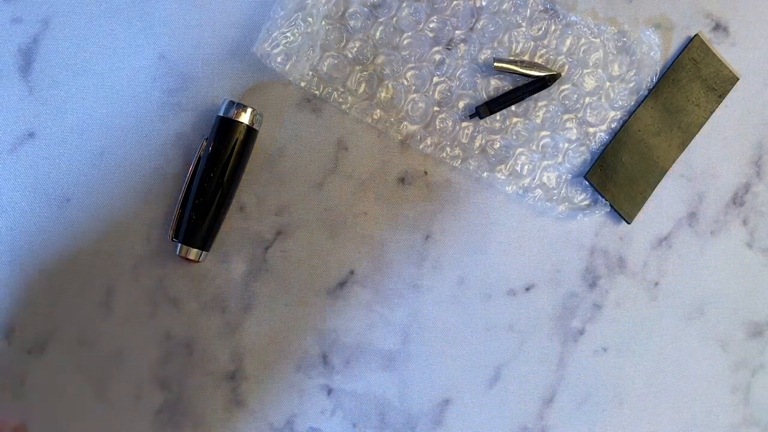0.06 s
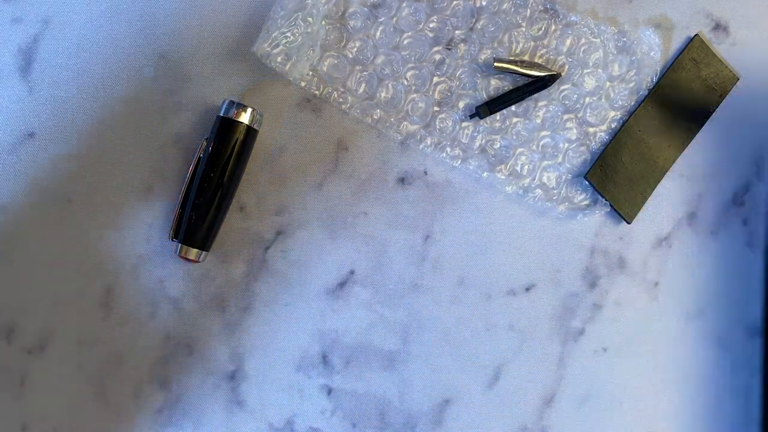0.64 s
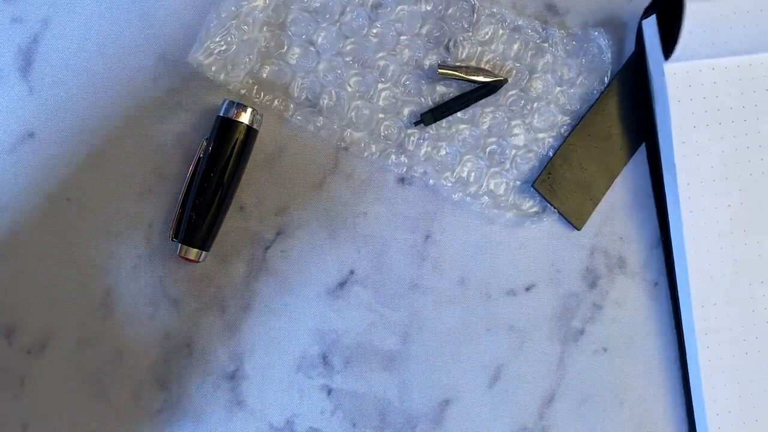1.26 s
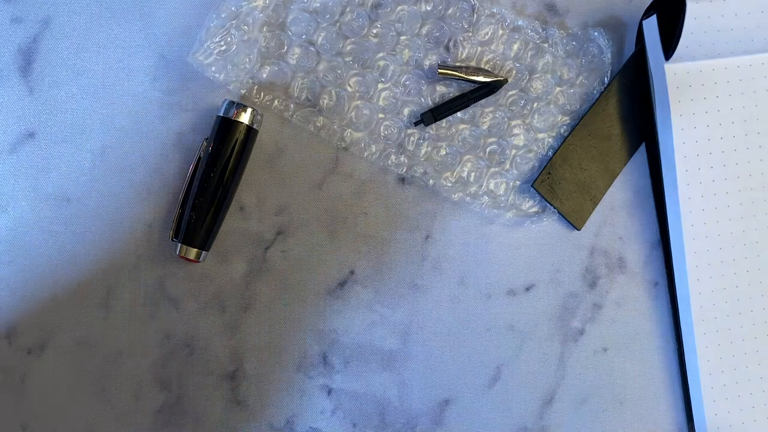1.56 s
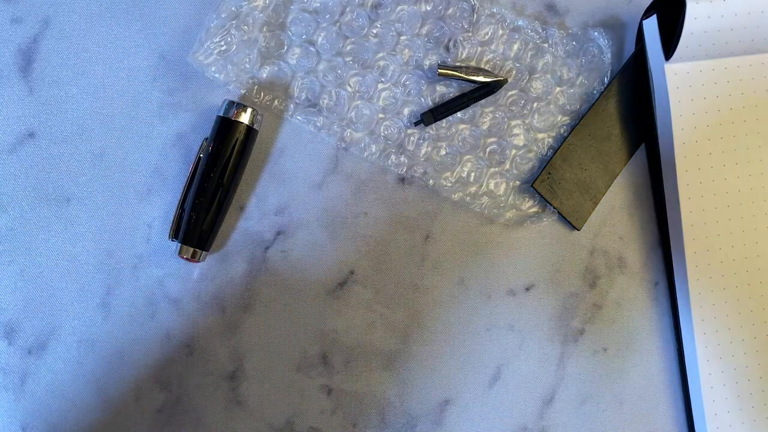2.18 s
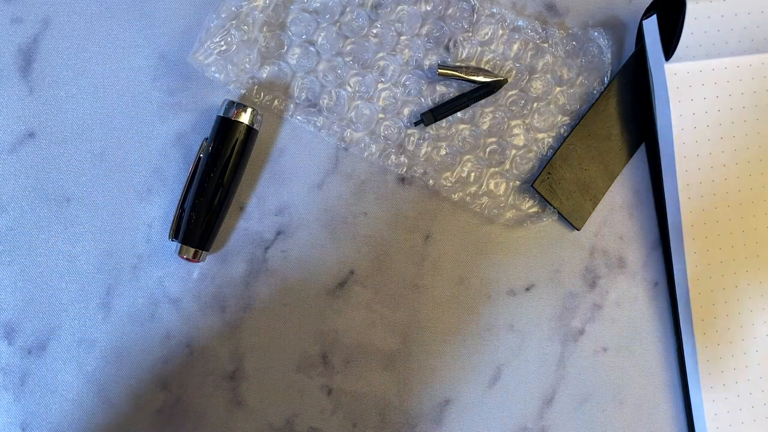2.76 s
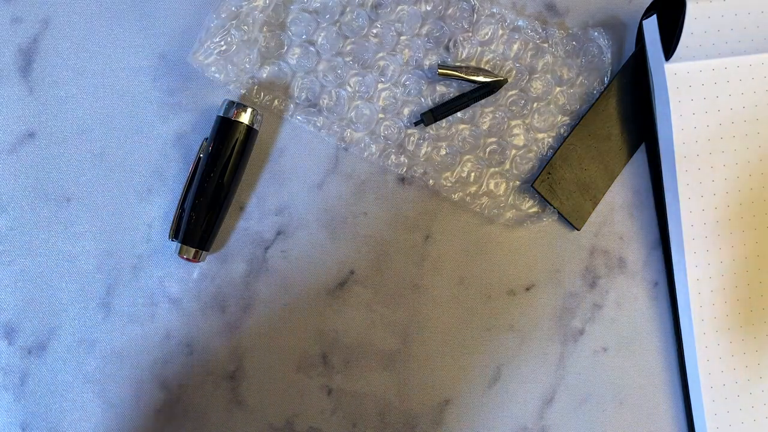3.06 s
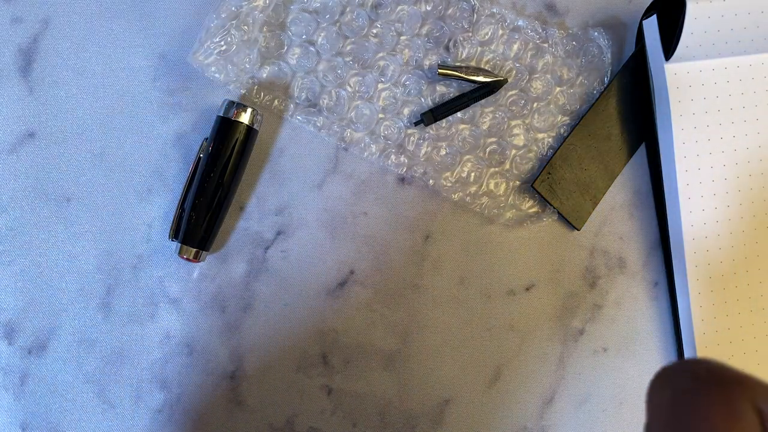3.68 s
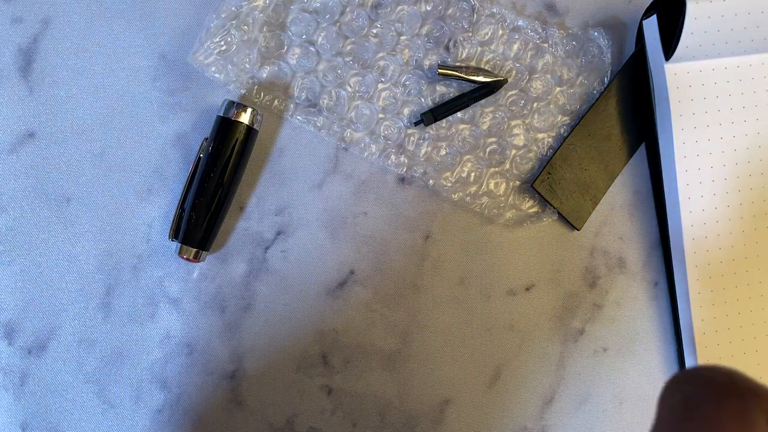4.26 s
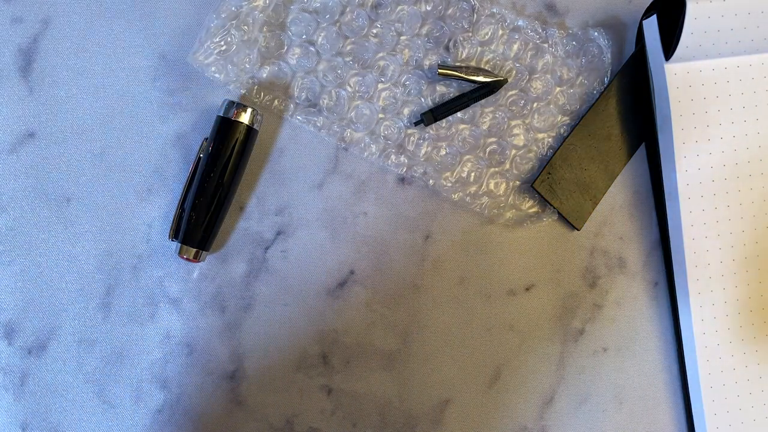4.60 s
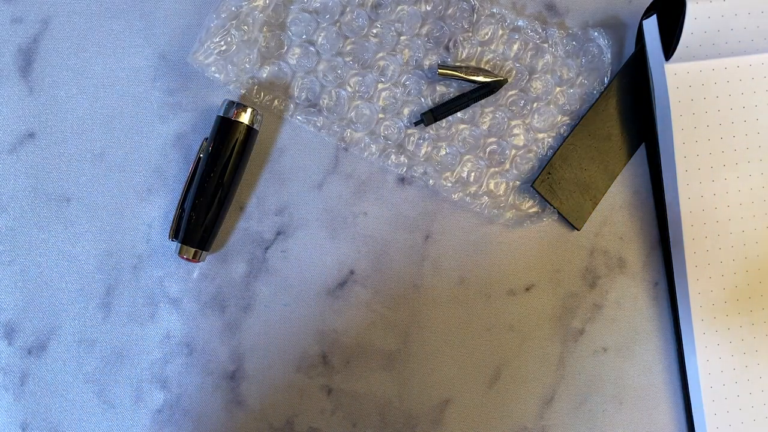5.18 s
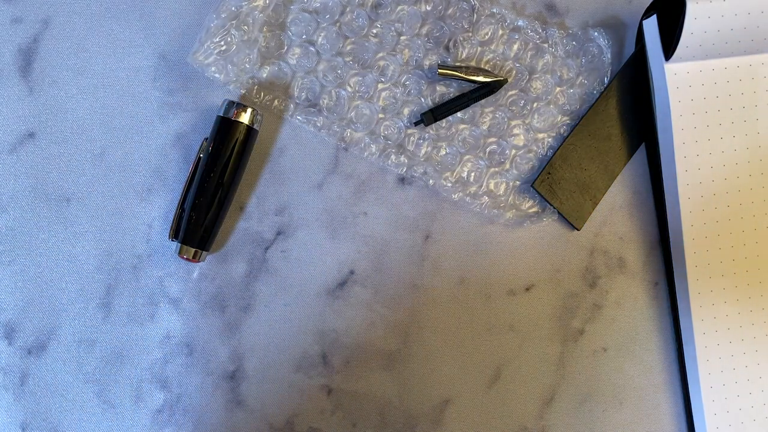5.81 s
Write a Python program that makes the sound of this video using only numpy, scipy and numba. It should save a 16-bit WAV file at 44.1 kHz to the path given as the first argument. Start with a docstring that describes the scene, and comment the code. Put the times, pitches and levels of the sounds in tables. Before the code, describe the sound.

A notebook slides over a stone desk and flops open, then hollow plastic pen parts click and knock together close by.

```python
"""A dry paper hiss: a notebook slides over a stone desk, close by in a small quiet room.
It flops open with swishing pages, snapping edges and thumps of trapped air, and is smoothed flat.
Then the hollow plastic parts of a pen click and knock together in the hand; each contact rings
the air in the barrel. Far off, a motor hums and beats slowly against the mains."""
import sys
import numpy as np
from scipy import signal
from scipy.fft import rfft, irfft, next_fast_len
from scipy.io import wavfile
from numba import njit

SR = 44100
rng = np.random.default_rng(int(sys.argv[2]) if len(sys.argv) > 2 else 0)


def digitize_waveform(pressure):
    """Quantize a signal to 16-bit integers and store it at the path in sys.argv[1].

    Rows of a 2-D input are taken as channels; values are limited to [-1, 1].
    """
    field = np.atleast_2d(pressure).T
    bounded = np.clip(field, -1, 1)
    quanta = np.round(bounded * 32767).astype(np.int16)
    wavfile.write(sys.argv[1], SR, quanta)


N = 266473
T = np.arange(N) / SR

# tone of the sliding cover, the opening pages and the smoothing palm: frequency_hz, gain_db
SLIDE_COLOUR = [(110, -28), (175, -6), (330, -5.5), (450, -8.5), (650, -6), (1150, -6.5), (1500, -9),
                (1850, -3), (2700, 0), (3400, 0.5), (4150, 1), (4750, 0.5), (7000, 0), (16000, -6)]
OPENING_COLOUR = [(120, -28), (200, -4.5), (500, -9), (579, -3), (950, -1), (1450, -3.5), (1910, -1),
                  (3070, -2), (3490, -3), (4680, 0.5), (11100, -7), (13800, -7), (16000, -12)]
SMOOTHING_COLOUR = [(180, -6), (300, -1.5), (326, -14), (593, -6), (689, -7), (856, -5), (1660, -4),
                    (3700, -3.5), (16000, -19)]
# texture of each rubbed surface: colour, grains_per_s, grain_db, flutter_db, desk_bounce_share
SURFACES = {"cover": (SLIDE_COLOUR, 2500, -9, 0.67, .11), "pages": (OPENING_COLOUR, 500, -9.5, 1, 0.059),
            "palm": (SMOOTHING_COLOUR, 1500, -15, 0.64, 0.064)}
# strokes over paper, with body and fizz set against the mid hiss:
# surface, peak_s, level_db, rise_s, fall_s, body_db, fizz_db, gap_hz, gap_strength
STROKES = [("cover", 0.069, -45.5, 0.083, 0.089, -11.5, -7, 6000, .25),
           ("cover", .21, -48, 0.075, 0.077, -10, -3.4, 3600, 0.51),
           ("cover", .365, -55.5, .04, 0.059, -0.7, -1.3, 1600, 0.72),
           ("cover", .51, -54, 0.055, 0.035, -5.5, -7.5, 3100, 1.8),
           ("cover", .61, -65.5, .018, .01, -5, -11, 2400, .3),
           ("pages", .628, -44.5, .004, 0.077, -6.5, -7, 3100, 0.38),
           ("pages", .86, -48, 0.064, 0.039, -3, -4.5, 3000, 0.52),
           ("pages", 0.93, -48, 0.032, .11, -9.5, -5.5, 3600, 0.17),
           ("pages", 1.125, -46.5, .055, 0.033, -2.5, -0.83, 2900, 0.091),
           ("palm", 1.24, -59, .01, 0.053, 0.87, -6, 2000, .1),
           ("palm", 1.56, -67, .16, .22, 0.56, -5, 3330, 0.81),
           ("palm", 2.1, -79, 0.14, 0.33, 1, -1.1, 4000, 0.44),
           ("palm", 2.33, -76, .035, .03, 2, 4, 3000, .1),
           ("palm", 2.86, -78.5, 0.11, 0.12, -4, 1.4, 3000, .5),
           ("palm", 3.15, -79, .08, 0.18, -1, 1.7, 3800, .5),
           ("palm", 4.93, -79, .15, .13, 5, -1, 3000, .1)]
# pages swish down: peak_s, level_db, rise_s, fall_s
SWISHES = [(1.139, -42.5, 0.016, 0.0075), (1.193, -41.5, 0.014, 0.009), (1.2141, -25.5, 0.0073, 0.0056),
           (1.221, -32.5, 0.0028, 0.0024)]
# tone of the swish: frequency_hz, gain_db
SWISH_COLOUR = [(150, -11.5), (400, -9), (850, -3.5), (1350, -10), (2000, 0.5), (2620, 3.5), (3200, -6),
                (3850, -3), (4400, 0), (5300, -5), (7900, -3.5), (9500, -8.5), (11500, -5), (16000, -11.5)]
# paper edges snap, and the cover lands with a dry crack: start_s, level_db, centre_hz
SNAPS = [(0.345, -35, 1900), (0.4272, -39, 750), (0.504, -25.5, 3100), (.6215, -31, 800),
         (.6222, -36, 2200), (0.868, -34, 2500), (0.929, -34, 5500), (.9945, -39, 4800),
         (1.0883, -33, 2500), (1.0976, -26.5, 910), (1.098, -20.3, 2700), (1.0999, -28, 8000),
         (1.2136, -23.5, 2700), (4.413, -55, 9500), (5.63, -60, 6000)]
# air pressed out from under the cover: start_s, level_db, first_hz, last_hz, t60_s
THUMPS = [(.428, -50, 500, 200, .06), (0.494, -45.5, 239, 170, 0.13), (0.6216, -34.5, 420, 145, 0.08),
          (0.635, -36, 90, 76, 0.091), (0.823, -50, 120, 84.5, 0.13), (1.121, -46, 200, 132, 0.2),
          (1.221, -45, 238, 125, 0.26)]

# pen parts touch once: start_s, ring_db, pitch_hz, wall_db, crack_db
CLICKS = [(1.84, -48, 1220, -60, -61), (2.112, -37.5, 1300, -59, -52), (2.249, -46, 1320, -45.5, -54),
          (2.2951, -28, 1320, -33.5, -35), (2.3211, -62, 1270, -57, -52), (2.4182, -36, 1340, -44.5, -34),
          (2.592, -51, 1250, -44, -46), (2.636, -47, 1390, -34, -35), (4.6323, -45.5, 1690, -44, -44.5),
          (4.7486, -9.7, 1640, -37.5, -40.5), (5.0974, -35, 1433, -34.5, -48),
          (5.2285, -32, 1340, -49, -52), (5.2456, -20.5, 1336, -52, -45)]
# pen parts land and bounce:
# start_s, ring_db, pitch_hz, wall_db, crack_db, first_gap_s, gap_ratio, tick_step_db
RATTLES = [(2.3739, -28.5, 1286, -37, -31.5, 0.016, 0.84, -3),
           (4.9488, -28.5, 1605, -55, -61.5, 0.016, 0.99, 3),
           (5.2634, -22.5, 1326, -34.5, -38, .0073, .42, -4.5)]
# modes of the barrel's plastic wall: pitch_hz, level_db, t60_s
WALL_MODES = [(659, -10, 0.015), (2210, -9.5, 0.018), (2750, -12, 0.0092), (4440, -8.5, 0.011),
              (4920, -3, 0.013), (5380, -4.5, 0.01), (6340, -8.5, 0.008), (9100, -18.5, 0.0066),
              (11520, -14.5, 0.0046), (14300, -19.5, 0.0075)]
# modes of the dull knock that comes with the hollow ring: pitch_hz, level_db, t60_s
KNOCK_MODES = [(500, -31.5, 0.006), (787, -14, 0.0067), (980, -20, 0.011), (2500, -24, 0.011),
               (3134, -31.5, .012)]
# pen parts rub before they let go: peak_s, level_db, rise_s, fall_s
SCUFFS = [(2.292, -72, .012, .003), (2.3735, -53, 0.0035, 0.0019), (2.418, -49.5, 0.015, .008),
          (2.634, -56, 0.0054, 0.0024)]
# tone of the scuff: frequency_hz, gain_db
SCUFF_COLOUR = [(300, -17), (1300, 5), (5000, -9), (16000, -23)]

# hands press on the desk: peak_s, level_db, rise_s, fall_s
HAND_THUDS = [(.85, -62, .08, 0.045), (1.21, -56, .07, .08), (2.53, -57, 0.075, .1), (5.35, -60, .12, 0.13)]
# reflections off nearby surfaces: delay_s, gain_db
ECHOES = [(0.011, -24), (0.0166, -27), (.0265, -44.5), (.039, -44)]
# tone of the room air and of the low rumble: frequency_hz, gain_db
AIR_COLOUR = [(90, -34.5), (150, -3.5), (200, -5.5), (300, -6), (520, -9.5), (1300, -14.5), (3000, -18),
              (6000, -22.5), (9000, -26.5), (12500, -33), (16000, -31.5)]
RUMBLE_COLOUR = [(15, -8.5), (28, -17.5), (40, -5.5), (58, 0), (85, -2.5), (110, -2), (160, -7),
                 (230, -13.5), (500, -52)]
# motor and mains tones: pitch_hz, level_db
HUM_TONES = [(57.5, -71), (116.62, -68), (120, -67.5)]


def paper_strokes(gap_glide_octaves=0.35):
    """Loudness follows each stroke's speed; the air gap under the sheet closes, so its pitch climbs."""
    out = np.zeros(N)
    for surface, peak_s, db, rise_s, fall_s, body_db, fizz_db, gap_hz, strength in STROKES:
        progress = (T - peak_s) / np.where(T < peak_s, rise_s, fall_s)
        moving = np.abs(progress) < 4
        speed = np.exp(-progress[moving] ** 2 / 2)
        glide_hz = gap_hz * 2 ** (gap_glide_octaves * np.tanh(progress[moving]))
        friction = paper_friction(glide_hz, strength, body_db, fizz_db, surface)
        out[moving] += undb(db) * speed * friction
    return out


def paper_friction(gap_hz, gap_strength, body_db, fizz_db, surface, desk_delay_s=0.000836):
    """Paper fibres catch and slip: a fine hiss with coarser grains, its pressure fluttering."""
    outline, grains_per_s, grain_db, flutter_db, bounce_share = SURFACES[surface]
    n = len(gap_hz)
    grains = ((rng.random(N) < grains_per_s / SR) * rng.standard_normal(N))[:n]
    rub = colour(rng.standard_normal(N)[:n] + undb(grain_db) * unit(grains), outline)
    rub = rub * undb(flutter_db * wander(91.3)[:n])
    rub = rub + gap_strength * resonate(rub, gap_hz, q=2.5)
    # the bounce off the desk combs the hiss, and the comb slides as the gap closes
    delay_s = desk_delay_s * gap_hz.mean() / gap_hz
    rub = rub - bounce_share * np.interp(T[:n] - delay_s, T[:n], rub)
    # split the sheet's body from the hiss and fizz of its fibres, then balance the three
    body = signal.sosfiltfilt(signal.butter(2, 1700, fs=SR, output="sos"), rub)
    fizz = signal.sosfiltfilt(signal.butter(2, 7200, "high", fs=SR, output="sos"), rub)
    hiss = rub - body - fizz
    layers = [(body, 400, 1600, body_db), (hiss, 2000, 6000, 0), (fizz, 8000, 15000, fizz_db)]
    return sum(undb(db) * layer / np.std(band(rub, lo_hz, hi_hz, order=4))
               for layer, lo_hz, hi_hz, db in layers)


def page_swishes():
    """Pages sweep over each other, swelling up to the moment they land."""
    return swell(SWISHES) * coloured_noise(SWISH_COLOUR)


def dry_cracks(t60_s=0.0062, spread=1.6):
    """A stiff paper edge lets go, or the cover lands, with a dry, broad crack."""
    out, t = np.zeros(N), T[:SR // 25]
    for start_s, db, hz in SNAPS:
        crack = band_noise(len(t), hz / spread, hz * spread)
        add(out, start_s, undb(db) * crack * fade(t, t60_s))
    return out


def cover_thumps(settle_s=0.00242, flap_db=-13):
    """The cover lands on a cushion of air; the pitch drops as more of it lies down."""
    out, t = np.zeros(N), T[:SR // 4]
    for start_s, db, first_hz, last_hz, t60_s in THUMPS:
        hz = last_hz + (first_hz - last_hz) * np.exp(-t / settle_s)
        cushion = np.sin(2 * np.pi * np.cumsum(hz) / SR)
        flap = undb(flap_db) * band_noise(len(t), 53, 170)
        add(out, start_s, undb(db) * (cushion + flap) * fade(t, t60_s))
    return out


def pen_clicks(build_s=0.00074, crack_t60_s=0.0088, bite_s=0.00023):
    """Each contact cracks, rings the wall briefly and builds up the air resonance of the barrel."""
    out, t = np.zeros(N), T[:SR // 10]
    for start_s, ring_db, hz, wall_db, crack_db in CLICKS + pen_bounces():
        ring_t60_s = 0.0205 * (hz / 1300) ** 2  # higher notes ring longer
        ring = np.sin(2 * np.pi * hz * t) * fade(t, ring_t60_s)
        hollow = (ring - strike(KNOCK_MODES, t)) * (1 - np.exp(-t / build_s))
        crack = band_noise(len(t), 540, 13000, order=1) * fade(t, crack_t60_s)
        tick = undb(wall_db) * strike(WALL_MODES, t) + undb(crack_db) * crack
        bite = 1 - np.exp(-t / bite_s)  # plastic gives a little, softening the attack
        add(out, start_s, undb(ring_db) * hollow + tick * bite)
    return out


def pen_bounces(count=4, ring_loss_db=3.5):
    """The contacts of every rattle: each comes sooner and rings less than the one before."""
    contacts = []
    for at_s, ring_db, hz, wall_db, crack_db, gap_s, gap_ratio, step_db in RATTLES:
        for k in range(count):
            tick_db = k * step_db
            contacts.append((at_s, ring_db - k * ring_loss_db, hz, wall_db + tick_db, crack_db + tick_db))
            at_s += gap_s * gap_ratio ** k
    return contacts


def pen_scuffs():
    """Plastic parts rub, swelling up to the moment they let go."""
    return swell(SCUFFS) * coloured_noise(SCUFF_COLOUR)


def hand_thuds():
    """Dull thuds of the hands, carried by the desk."""
    return swell(HAND_THUDS) * band_noise(N, 38, 120)


def room(x, tail_db=-20, low_t60_s=0.29, treble_t60_s=0.2, onset_s=0.0034):
    """A few early echoes and a short diffuse tail that dulls as it dies."""
    t = T[:SR // 2]
    low = band(rng.standard_normal(len(t)), 100, 3000) * fade(t, low_t60_s)
    treble = undb(1) * band(rng.standard_normal(len(t)), 3000, 12000) * fade(t, treble_t60_s)
    tail = (low + treble) * np.minimum(t / onset_s, 1)
    response = undb(tail_db) * unit(tail) / np.sqrt(len(t))
    for delay_s, db in ECHOES:
        response[int(delay_s * SR)] += undb(db)
    return x + signal.fftconvolve(x, response)[:N]


def room_tone(air_db=-67.5, rumble_db=-66.5):
    """A steady bed of soft air and low rumble."""
    return undb(air_db) * coloured_noise(AIR_COLOUR) + undb(rumble_db) * coloured_noise(RUMBLE_COLOUR)


def motor_hum(in_step_s=3.85, drift_rad=0.18):
    """A distant motor beats against the mains, each tone wavering a little in phase."""
    return sum(undb(db) * unit(np.cos(2 * np.pi * hz * (T - in_step_s) + drift_rad * wander(3.4)))
               for hz, db in HUM_TONES)


def strike(modes, t, scatter_db=3.0, detune=0.042):
    """Ring a table of modes; the point of contact changes how each one speaks."""
    chance = rng.standard_normal((len(modes), 2))
    return sum(undb(db + scatter_db * a) * np.sin(2 * np.pi * hz * (1 + detune * b) * t) * fade(t, t60_s)
               for (hz, db, t60_s), (a, b) in zip(modes, chance))


def swell(table):
    """Envelope of pushes that grow to a peak and die away."""
    return sum(undb(db) * np.exp(-np.maximum((peak_s - T) / rise_s, (T - peak_s) / fall_s))
               for peak_s, db, rise_s, fall_s in table)


def fade(t, t60_s):
    """Exponential decay, 60 dB down at t60_s."""
    return np.exp(-np.log(1000) * t / t60_s)


def wander(rate_hz):
    """Smooth random motion at rms 1."""
    knots = np.arange(0, T[-1] + 1, 1 / rate_hz)
    return unit(np.interp(T, knots, rng.standard_normal(len(knots))))


def coloured_noise(outline):
    """Noise with the given tone, at rms 1."""
    return unit(colour(rng.standard_normal(N), outline))


def band_noise(n, lo_hz, hi_hz, order=2):
    """Band-passed noise at rms 1."""
    return unit(band(rng.standard_normal(n), lo_hz, hi_hz, order))


def colour(x, outline):
    """Equalise along a curve of frequency_hz, gain_db points."""
    hz, db = np.transpose(outline)
    size = next_fast_len(len(x))
    bins_hz = np.fft.rfftfreq(size, 1 / SR) + 1
    gain = undb(np.interp(np.log(bins_hz), np.log(hz), db))
    return irfft(rfft(x, size) * gain, size)[:len(x)]


def band(x, lo_hz, hi_hz, order=2):
    """Flat-topped band-pass."""
    return signal.sosfilt(signal.butter(order, [lo_hz, hi_hz], "band", fs=SR, output="sos"), x)


@njit
def resonate(x, hz, q):
    """Swept resonant band-pass."""
    y, band_state, low_state = np.empty(len(x)), 0., 0.
    for i in range(len(x)):
        g = np.tan(np.pi * hz[i] / SR)
        passed = (band_state + g * (x[i] - low_state)) / (1 + g * (g + 1 / q))
        band_state = 2 * passed - band_state
        low_state += 2 * g * passed
        y[i] = passed / q
    return y


def add(out, start_s, sound):
    """Mix a sound in at its cue."""
    i = int(start_s * SR)
    out[i:i + len(sound)] += sound[:max(N - i, 0)]


def undb(db):
    """Decibels to gain."""
    return 10 ** (np.asarray(db) / 20)


def unit(x):
    """Scale to rms 1."""
    return x / np.sqrt(np.mean(x ** 2) + 1e-20)


def scene():
    """Notebook and pen in the room over a quiet bed, the same in both ears."""
    notebook = paper_strokes() + page_swishes() + dry_cracks() + cover_thumps()
    pen = pen_scuffs() + pen_clicks()
    mono = room(notebook + pen) + hand_thuds() + room_tone() + motor_hum()
    return np.array([mono, mono])


def record(dry):
    """A steep low-pass trims the top above 16 kHz."""
    return signal.sosfilt(signal.ellip(10, .2, 70, 16000, fs=SR, output="sos"), dry)


dry = scene()
out = record(dry)
digitize_waveform(out)
```